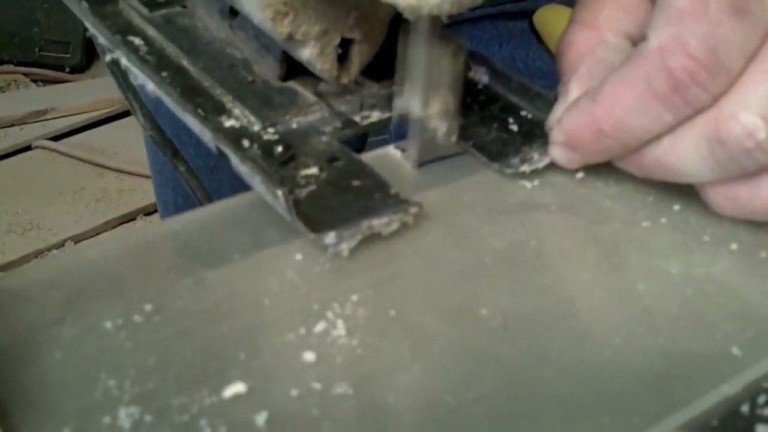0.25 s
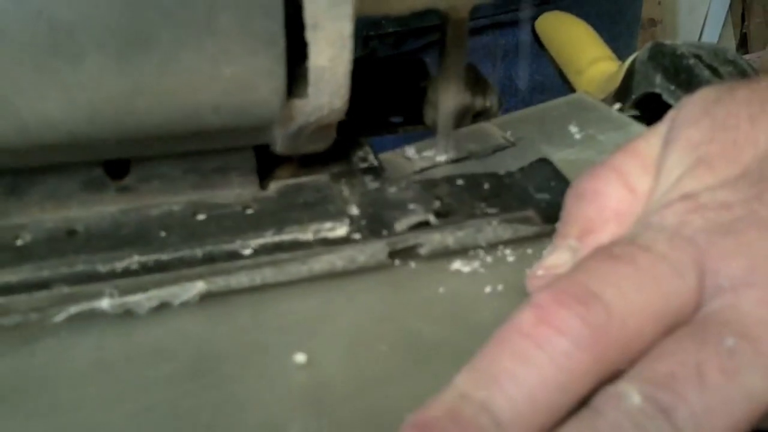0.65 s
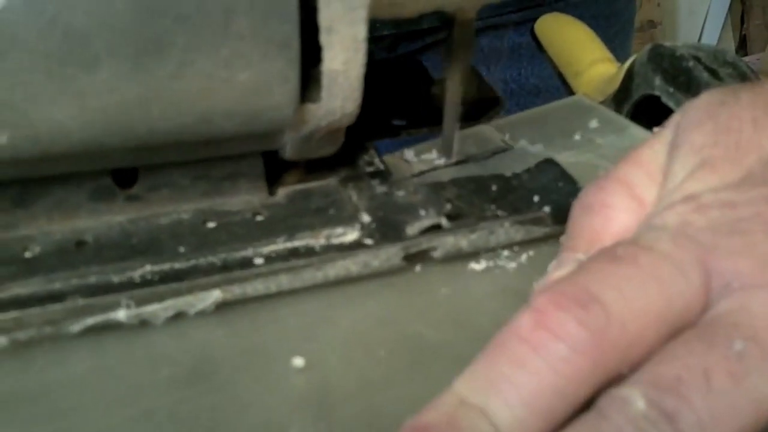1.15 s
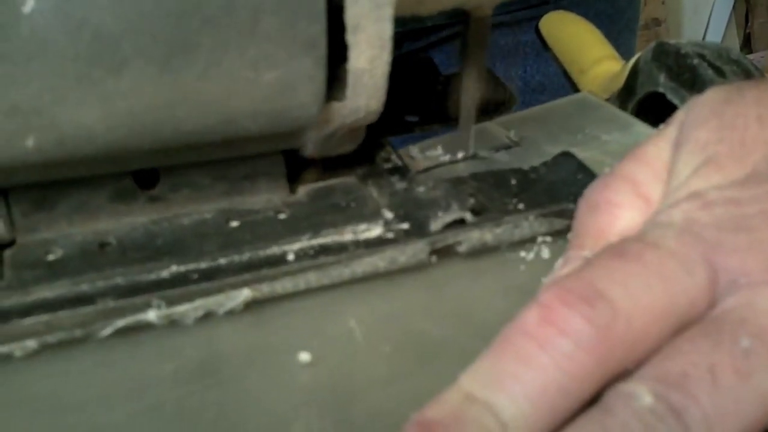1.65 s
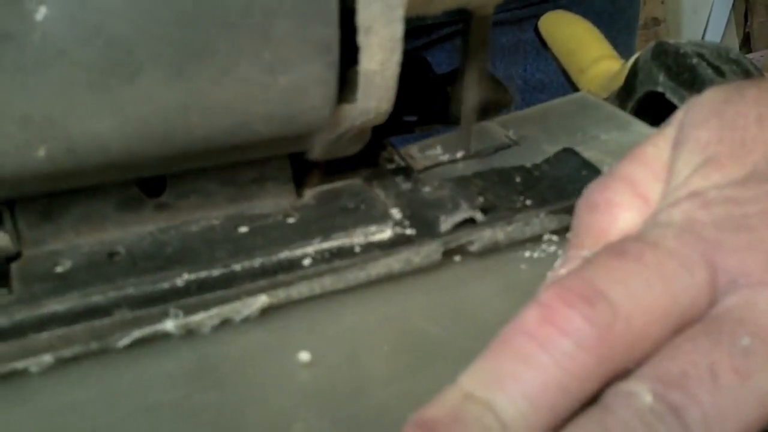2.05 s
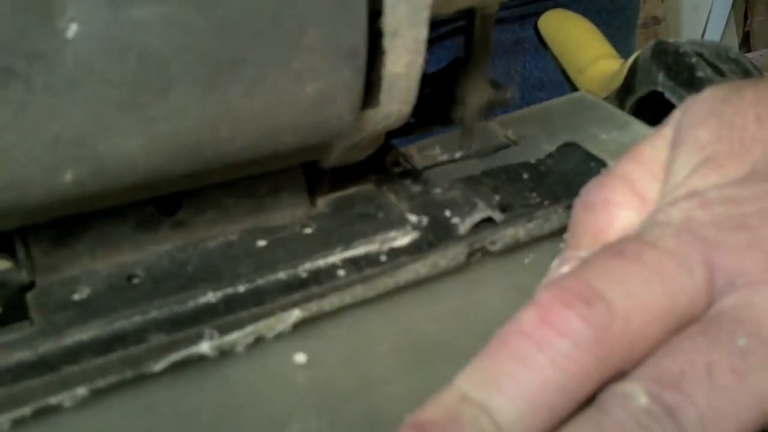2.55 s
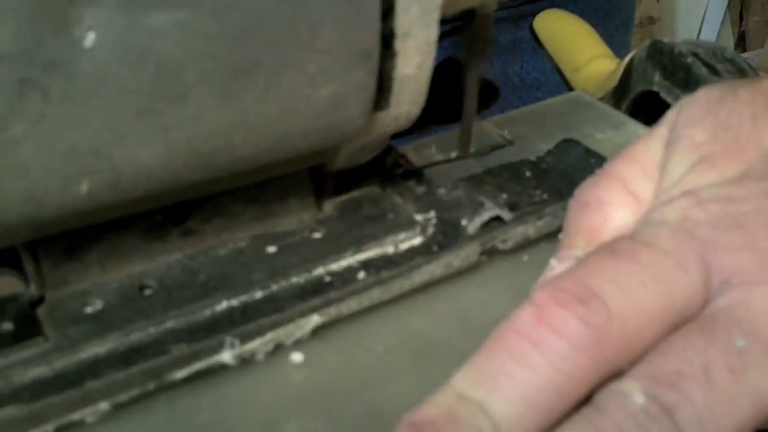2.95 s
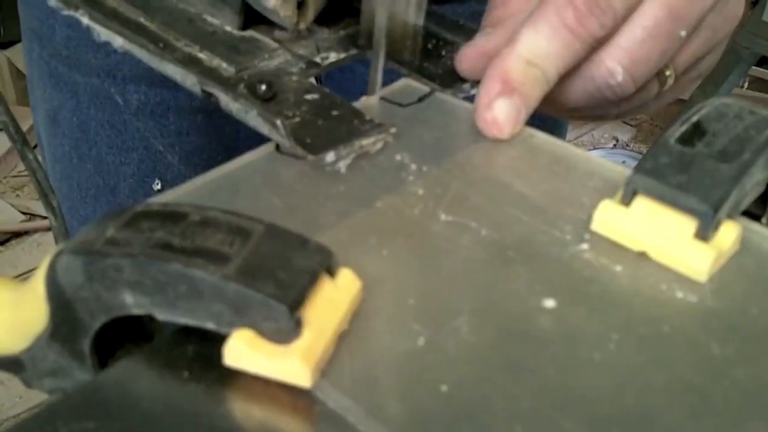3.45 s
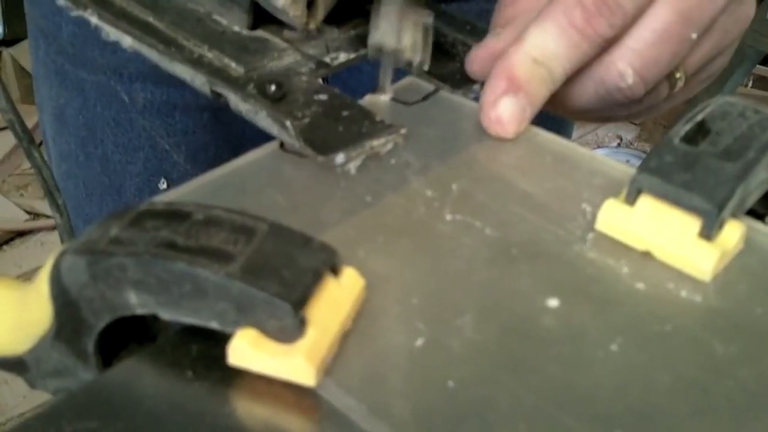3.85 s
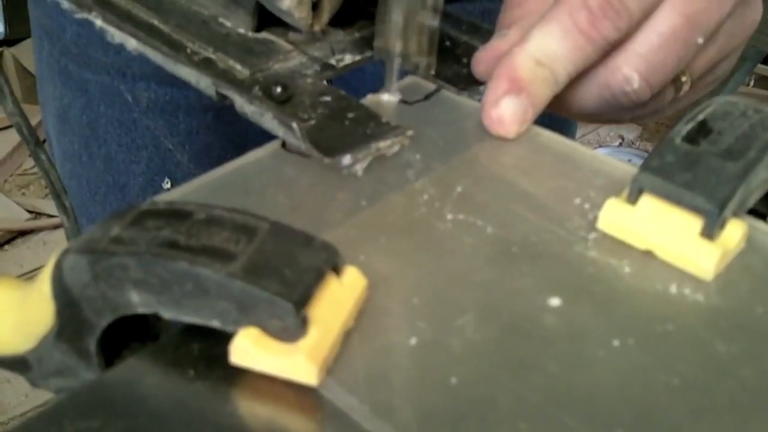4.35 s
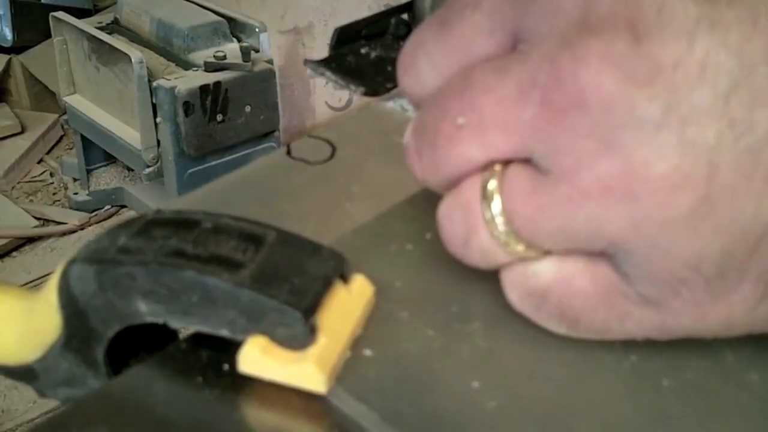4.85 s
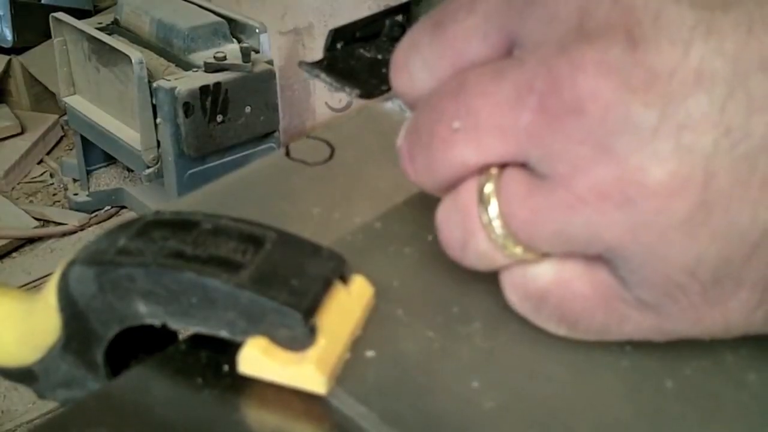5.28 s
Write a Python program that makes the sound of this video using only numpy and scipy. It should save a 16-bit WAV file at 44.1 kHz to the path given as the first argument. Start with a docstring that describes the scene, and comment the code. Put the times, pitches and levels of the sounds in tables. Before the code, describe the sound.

A jigsaw cuts a plastic sheet close up in four passes, a throbbing, buzzing rasp with knocks and brief dips between.

```python
"""In a workshop, close up, a jigsaw cuts a clamped plastic sheet in four passes joined by quick fades.
Each stroke drags the teeth through the plastic and slaps the sheet against the shoe: a throbbing rasp
with hard knocks and a hiss of dust. For a while the sheet's edge taps and the blade squeaks in the kerf.
The crank gear whines, the mechanism hums at multiples of the stroke rate and the bench rumbles.
Once, the microphone is bumped."""
import sys
import numpy as np
from scipy import signal
from scipy.fft import rfft, irfft
from scipy.io import wavfile
from scipy.ndimage import uniform_filter1d

SR = 44100
rng = np.random.default_rng(int(sys.argv[2]) if len(sys.argv) > 2 else 0)


def int16_out(signal):
    """Quantize to a 16-bit WAV file."""
    q = np.round(np.clip(np.atleast_2d(signal).T, -1, 1) * 32767)
    wavfile.write(sys.argv[1], SR, q.astype(np.int16))


N = 243431
TIME = np.arange(N) / SR
HZ = np.fft.rfftfreq(N, 1 / SR)
GEAR_TEETH, PINION_TEETH = 70, 9


def cutting(t, strokes, cut):
    """Chips and slaps shake the plastic sheet and the steel; fine dust hisses above them."""
    # tone of the sheet and of the steel blade and shoe, a list a pass: frequency_hz, gain_db
    sheet_eq = [
        [(88, -48), (150, -16), (236, -19.5), (346, -15.5), (419, -10), (501, -14), (558, -8.5), (1200, -13.5),
         (1320, -3.5), (2000, -8), (2170, -5.5), (2600, -6.5), (3380, -38), (5720, -120)],
        [(88, -36), (150, -10.5), (215, -18), (260, -16.5), (334, -13.5), (466, -12.5), (519, -10.5),
         (691, -11.5), (977, -9.3), (1300, -13.5), (1470, -8.2), (1820, -9.3), (2000, -0.5), (2310, -4.5),
         (2600, -13.5), (3380, -40), (5720, -120)],
        [(88, -57), (150, -10.5), (215, -28), (318, -9), (372, -15.5), (461, -7), (495, -1.5), (606, -8),
         (699, -4.5), (798, -11), (1110, -6), (1210, -7.5), (1610, -2), (2150, -5.3), (2600, -6), (3380, -29),
         (5720, -120)],
        [(88, -49), (150, -14), (195, -25), (215, -31), (254, -17), (372, -14), (495, -5), (571, -20.5),
         (725, -6), (954, -24.5), (1170, -2), (1730, -9.5), (1880, -5.5), (2360, -4.5), (2600, -12),
         (3380, -48), (5720, -120)],
    ]
    steel_eq = [
        [(1650, -44), (2800, -10.5), (3360, 1.5), (3610, 1.5), (3930, -3), (4100, 1.5), (4390, -0.5), (4670, 2),
         (4970, -2), (5400, -20), (7020, -48), (11900, -120)],
        [(1650, -77.5), (2800, -24), (2970, -4), (3240, -0.5), (3380, 1.5), (3550, -4), (4020, 2.5), (4250, 1),
         (4780, 1), (4970, -4.5), (5200, -18), (5400, -21.5), (7020, -49), (11900, -120)],
        [(1650, -38), (2800, -19), (2970, -6.5), (3300, -0.5), (3620, -1), (4710, 0), (5030, -3.5), (5220, -29),
         (5400, -28), (7020, -47), (11900, -120)],
        [(1650, -34), (2800, -11), (3000, -11), (3210, -1), (3400, 0.5), (3900, -2), (4240, -1.5), (4630, -2.5),
         (4970, -3.5), (5400, -36), (7020, -39), (11900, -120)],
    ]
    # tone of the dust's hiss and of brittle splintering: frequency_hz, gain_db
    dust_eq = [(5200, -36), (5700, 0), (6400, 4), (7200, -2.5), (8200, -11), (9300, -9.5), (10400, -11.5),
               (14000, -21.5)]
    splinter_eq = [(8200, 3), (9200, 3.5), (11600, 3), (13800, 1.5), (15200, -19.5)]
    blade_db, sheet_db, dust_db, looseness = feed(t, cut)
    slap = slaps(strokes, cut)
    grit = chips(len(t), per_s=3200, spread_db=2.5, scrape=0.82) * amp(1.92 * wander(t, 420))
    flexing = evened(grit + 1.75 * rng.standard_normal(grit.shape))  # the heavy sheet blurs the chips
    clatter = knocks(t, strokes, rise_s=.0018, decay_s=.0022) * rng.standard_normal(grit.shape)
    blows = evened(slap) * looseness * rng.standard_normal(grit.shape)  # favours the firmest slaps

    def throb(depth):
        power = 1 + depth * slap * looseness ** 2
        return np.sqrt(power / uniform_filter1d(power, size=3000))

    sheet = amp(blade_db + sheet_db + 1) * flexing * throb(0.94) + amp(-10.5) * clatter
    steel = amp(blade_db - 0.86) * grit * throb(0.34) + amp(2) * clatter
    dust = amp(blade_db + dust_db - 0.86) * grit * throb(1) + amp(-12) * clatter
    splinters = amp(blade_db - 28.6) * grit * throb(0.38) + amp(-23) * clatter
    splinters *= amp(1.04 * (dust_db + 15.5))  # splintering grows faster than the dust
    strikes = amp(blade_db - 3) * blows + amp(-1.5) * clatter
    return (colour(sheet, sheet_eq[cut]) + colour(steel, steel_eq[cut])
            + colour(dust, dust_eq) + colour(splinters, splinter_eq) + clack(strikes, cut))


def feed(t, cut):
    """A firm feed makes the blade louder; as it eases, the sheet lifts and sheds more dust."""
    # push on the saw, a list a pass: time_s, feed_db
    pushes = [
        [(0, -1), (.3, 1)],
        [(.6, -1.3), (1.25, -.7), (1.65, -1.3), (1.8, .7), (2.6, 0), (3.3, -.1)],
        [(3.52, -1), (3.93, -3.6), (4.0, .2), (4.65, -.1)],
        [(4.8, -7), (4.93, -2.5), (5.04, -7), (5.12, .3), (5.36, 0), (5.46, -3.5)],
    ]
    # balance of the cut, a row a pass: blade_db, sheet_db and dust_db (both relative to the blade),
    # held_slap_gain, lifted_slap_gain
    balance = [(-24.1, -11.2, -14.3, .8, .8), (-25.4, -8.3, -16, .62, 1.1), (-25.5, -7.8, -12.6, .85, 1.45),
               (-26.4, -5, -14.8, .7, .85)]
    blade_db, sheet_db, dust_db, held, lifted = balance[cut]
    feed_db = glide(pushes[cut], t)
    lift = np.clip(feed_db / -1.2, 0, 1)  # fully lifted at a feed of -1.2 dB
    looseness = held + (lifted - held) * lift
    return blade_db + feed_db, sheet_db + .3 * lift, dust_db + 3 * lift, looseness


def chips(count, per_s, spread_db, scrape):
    """Teeth tear out chips of very unequal size over a smooth scrape; both channels share each chip."""
    size = amp(spread_db * np.minimum(rng.exponential(1, count), 4))
    torn = rng.random(count) < per_s / SR
    clicks = evened(size * torn * rng.choice([-1, 1], (2, count)))
    return evened(clicks + scrape * rng.standard_normal((2, count)))


def slaps(strokes, cut, uneven_db=.8, scatter_strokes=.01):
    """Power envelope of the sheet slapping the shoe; no two slaps are quite alike."""
    # slaps within a stroke, a list a pass: place_strokes, width_strokes, strength_db
    pattern = [
        [(.41, .06, 0.5), (.82, 0.061, -1)],
        [(.28, 0.027, 4), (.38, 0.051, -1.5), (.61, 0.056, -6), (.95, 0.088, -1)],
        [(.33, .05, 1.5), (.635, 0.05, 3)],
        [(.235, .045, 9.5), (.6, .04, 7.5), (.88, 0.06, -1)],
    ]
    power = 0
    for place, width, db in pattern[cut]:
        nearest = np.round(strokes - place).astype(int)
        strength, lag = rng.standard_normal((128, 2))[nearest + 1].T
        offset = strokes - nearest - place - scatter_strokes * lag
        power += amp(db + uneven_db * strength) ** 2 * np.exp(-.5 * (offset / width) ** 2)
    return power


def knocks(t, strokes, rise_s, decay_s):
    """Envelope of the hard knocks: a tooth catches, or the lifted sheet hits the shoe once a stroke."""
    # lone catches: time_s, level_db
    catches = [(0.6128, -20), (1.3953, -14), (1.8088, -19), (3.605, -17.5), (4.0361, -21), (4.1135, -22),
               (4.3136, -20), (4.6262, -17), (4.8364, -19), (4.9325, -21), (5.3763, -23), (5.4167, -21)]
    # spells of chatter: start_s, end_s, place_strokes, level_db
    chatter = [(1.15, 1.7, .28, -26), (3.71, 3.88, .62, -17), (4.27, 4.66, .32, -24.5),
               (4.74, 4.84, .26, -25), (4.92, 5.09, .24, -23), (5.19, 5.32, .61, -21),
               (5.36, 5.51, .21, -21.5)]
    hits = list(catches)
    for start, end, place, db in chatter:
        times = np.interp(np.arange(strokes[-1]) + place, strokes, t, right=np.inf)
        hits += [(s, db) for s in times if start < s < end]
    return sum(amp(db) * np.exp(-np.maximum((s - t) / rise_s, (t - s) / decay_s).clip(0, 50))
               for s, db in hits)


def clack(strikes, cut):
    """Slaps and knocks ring the sheet's short, damped modes."""
    # modes of the sheet as it is held, a list a pass: pitch_hz, t60_s, level_db
    modes = [
        [(1330, 0.015, -15.5), (3460, 0.02, -11)],
        [(1045, 0.022, -17), (1240, 0.032, -12.5), (1468, .03, -13)],
        [(702, 0.036, -19.5), (1650, 0.045, -17.5), (3330, 0.02, -15), (4630, 0.013, -7.5)],
        [(1220, 0.027, -15.5), (2416, 0.013, -4), (3370, .015, -20), (4560, 0.024, -5.5)],
    ]
    age = TIME[:2048]
    body = 0
    for hz, t60, db in modes[cut]:
        mode = amp(-60 * age / t60) * np.cos(2 * np.pi * hz * age)
        body += amp(db) * mode / np.linalg.norm(mode)
    return convolved(strikes, body)


def edge_taps(t, strokes, place=.23, bend=.4, bend_s=.002, rise_s=.0012, t60_s=.04):
    """Once a stroke the free edge lands on the shoe; its note bends up as it is pressed home, and dies."""
    # spells in which the edge rings: start_s, end_s, pitch_hz, level_db
    spells = [(.59, .9, 1230, -27), (.85, 1.42, 1340, -27.5), (1.33, 1.73, 1045, -25.5)]
    age = (strokes - place) % 1 / (np.gradient(strokes) * SR)
    blow = (1 - np.exp(-age / rise_s)) * amp(-60 * age / t60_s + 2 * wander(t, 30))
    bent_age = age - bend * bend_s * (1 - np.exp(-age / bend_s))
    notes = 0
    for start, end, hz, db in spells:
        cycles = hz * bent_age + .25 * wander(t, 90)
        notes += amp(db) * swell(t, start, end) * np.sin(2 * np.pi * cycles)
    return blow * notes


def gear_whine(t, strokes, cut, width_hz=400):
    """Teeth mesh hardest on the loaded part of the stroke; the whine swells near a housing resonance."""
    # resonance of the housing, a row a pass: pitch_hz, level_db
    housing = [(2200, -34), (2040, -26.5), (2050, -33), (2050, -47)]
    housing_hz, db = housing[cut]

    def load(place, sharpness):
        return np.exp(sharpness * (np.cos(2 * np.pi * (strokes - place)) - 1))

    stroke_hz = np.gradient(strokes) * SR
    fast = np.clip((stroke_hz - 30.5) / 2.8, 0, 1)
    slow_load = load(0.89, 2) + 0.58 * load(0.33, 2)
    fast_load = load(0.876, 1.8) + 1.95 * load(0.18, 9.3)  # the plunger's two reversals
    pressure = (1 - fast) * slow_load + fast * fast_load
    mesh = GEAR_TEETH * strokes + 0.15 * wander(t, 150)
    tone = np.sin(2 * np.pi * mesh) + amp(-7.5) * np.sin(4 * np.pi * mesh)
    detuning = 2 * (GEAR_TEETH * stroke_hz - housing_hz) / width_hz
    return amp(db) / (1 + detuning ** 2) * evened(pressure * tone * amp(1.34 * wander(t, 160)))


def blade_squeak(t, strokes, pitch_hz=1485, peak_s=.9, end_s=1.85, place=.96, width=.1):
    """The blade's flank sticks and slips in the kerf once a stroke, and slowly frees itself."""
    rise_db_per_s, fall_db_per_s, stop_db_per_s = 130, 13, 200
    age = t - peak_s
    db = -33 + np.minimum(rise_db_per_s * age, -fall_db_per_s * age)
    db -= stop_db_per_s * np.maximum(t - end_s, 0)
    level = amp(db + 1.5 * wander(t, 60))
    offset = (strokes - place + .5) % 1 - .5
    rub = np.exp(-.5 * (offset / width) ** 2)
    tone = np.sin(2 * np.pi * (pitch_hz * t + .28 * wander(t, 120)))
    return level * evened(rub * tone)


def sheet_resonances():
    """Resonances of the sheet and its support swell and die as the saw moves on."""
    # singing resonances: start_s, end_s, pitch_hz, width_hz, level_db
    resonances = [(-.1, 0.502, 36.8, 2, -43.5), (0.086, 0.33, 98, 3.3, -38.5), (1.7, 3.305, 995, 57, -46),
                  (0.503, 1.9, 4086, 187, -40), (1.85, 3.35, 7030, 190, -47), (1.9, 3.35, 3292, 127, -36.5),
                  (3.85, 4.8, 498, 5.6, -46), (5.043, 5.607, 502.5, 7, -44)]
    singing = 0
    for start, end, hz, width, db in resonances:
        drift = np.cumsum(rng.standard_normal(N)) * np.sqrt(2 * np.pi * width / SR)
        tone = np.sqrt(2) * np.sin(2 * np.pi * hz * TIME + drift)
        singing += amp(db) * swell(TIME, start, end) * tone
    return singing


def mechanism_hum(t, strokes, cut):
    """The plunger shakes the saw, unevenly as the load shifts; the armature adds its own tone."""
    # plunger harmonics: stroke_rate_multiple, then level_db for each of the four passes
    harmonics = [(1.0, -58.0, -62, -44.8, -58), (2.0, -62.0, -63, -49.5, -55),
                 (3.0, -50.5, -43.5, -51, -52), (4.0, -62, -48.5, -60, -57), (5.0, -60, -55.5, -63, -51),
                 (6.0, -61, -59, -62, -65), (7.0, -66, -70, -61, -58), (8.0, -64, -66, -77.0, -87.0),
                 (9.0, -66, -53, -58, -68)]
    # unbalance of the armature, one a pass: level_db
    armature_db = [-70, -51, -62, -72]
    partials = [(multiple, levels_db[cut]) for multiple, *levels_db in harmonics]
    partials.append((GEAR_TEETH / PINION_TEETH, armature_db[cut]))
    speed = np.gradient(strokes)
    hum = 0
    for multiple, db in partials:
        level = amp(db + 1.6 * wander(t, 9))
        hum += level * np.sin(2 * np.pi * (multiple * strokes + rng.random()) + .2 * wander(t, 16))
    return (speed / speed.mean()) ** 2 * hum  # inertial forces grow with the square of the speed


def microphone_bump(start_s, level_db, relax_s, rise_s):
    """A step of pressure that relaxes and undershoots."""
    age = np.maximum(TIME - start_s, 0)
    step = 1 - np.exp(-(age / rise_s) ** 2)
    return amp(level_db) * step * (1 - age / relax_s) * np.exp(-age / relax_s)


def bench_rumble(level_db):
    """The shaking bench gives a low noise."""
    # tone of the bench: frequency_hz, gain_db
    bench_eq = [(25, 10), (60, 1), (110, -4.5), (200, -19.5)]
    return amp(level_db) * colour(rng.standard_normal((1, N)), bench_eq)


def room(x, t60_s, wet_db):
    """Dense, short reflections from the bench and walls."""
    t = TIME[:SR // 3]
    tail = rng.standard_normal((2, len(t))) * amp(-60 * t / t60_s) * (t > .002)
    return x + amp(wet_db) * convolved(x, tail / np.linalg.norm(tail[0]))


def microphone_ports(x):
    """Two close ports agree in the bass; in the treble they part and the left one lags."""
    # likeness of left and right: frequency_hz, coherence
    likeness = [(700, 1), (1400, 1), (3100, 0.96), (4500, 0.93), (6800, 0.95), (10000, 0.55), (15000, 0.8)]
    # phase between the ports: frequency_hz, left_lead_rad
    port_phase = [(1300, 0), (2400, 0.075), (3600, -0.39), (4700, -0.46), (7000, -0.98), (10000, -1.13),
                  (14000, -2.3)]
    coherence = spectrum(likeness, HZ)
    mid = rfft(x[0]) * np.sqrt((1 + coherence) / 2)
    side = rfft(x[1]) * np.sqrt((1 - coherence) / 2)
    lead = np.exp(.5j * spectrum(port_phase, HZ))
    return irfft(np.array([(mid + side) * lead, (mid - side) / lead]), N)


def amp(db):
    """Decibels to gain."""
    return 10 ** (np.asarray(db) / 20)


def evened(x):
    """Scales to unit rms."""
    return x / np.sqrt(np.mean(x ** 2) + 1e-20)


def glide(points, t):
    """Points joined by straight lines in time."""
    return np.interp(t, *np.transpose(points))


def spectrum(points, hz):
    """Points joined by straight lines in log frequency."""
    point_hz, value = np.transpose(points)
    return np.interp(np.log(hz + 1), np.log(point_hz + 1), value)


def swell(t, start_s, end_s):
    """A rounded arch from silence to silence."""
    return np.sqrt(np.sin(np.pi * np.clip((t - start_s) / (end_s - start_s), 0, 1)).clip(0))


def wander(t, per_s):
    """Random drift of about unit size."""
    knots = np.arange(0, 6, 1 / per_s)
    return np.interp(t, knots, rng.standard_normal(len(knots)))


def convolved(x, response):
    """Plays x through an impulse response, keeping its length."""
    return signal.oaconvolve(x, np.atleast_2d(response), axes=1)[:, :x.shape[1]]


def colour(x, eq):
    """Minimum-phase filter of unit energy that follows eq and falls steeply outside it."""
    hz = abs(np.fft.fftfreq(4096, 1 / SR)) + 1
    octaves_outside = abs(np.log2(hz / np.clip(hz, eq[0][0], eq[-1][0])))
    gain_db = np.maximum(spectrum(eq, hz) - 60 * octaves_outside, -90)
    log_response = np.conj(signal.hilbert(np.log(amp(gain_db))))
    response = np.fft.ifft(np.exp(log_response)).real
    return convolved(x, response / np.linalg.norm(response))


def scene():
    """Four passes of the saw; the level dips briefly at each join."""
    # speed of the saw, a table a pass: time_s, stroke_rate_hz
    speed_1 = [(0.0, 38.44), (0.12, 34.51), (0.25, 28.99), (0.38, 26.22), (0.5, 27.43)]
    speed_2 = [(0.5, 29.523), (0.709, 28.399), (1.152, 32.016), (1.527, 28.573), (1.942, 32.789),
               (2.226, 34.135), (2.628, 33.152), (3.37, 33.896)]
    speed_3 = [(3.37, 34.8), (3.641, 36.333), (3.931, 34.861), (4.74, 36.408)]
    speed_4 = [(4.74, 27.57), (4.89, 26.63), (5.05, 27.46), (5.21, 27.06), (5.36, 25.97), (5.52, 26.91)]
    # fades into passes 2, 3 and 4: length_s
    fade_in_s = [0.09, 0.115, .04]
    fade_out_s, fade_floor = .1, .025
    rasp, tones, fade = np.zeros((2, N)), sheet_resonances(), np.ones(N)
    for cut, speed in enumerate([speed_1, speed_2, speed_3, speed_4]):
        now = (TIME >= speed[0][0]) & (TIME < speed[-1][0])
        t = TIME[now]
        strokes = np.cumsum(glide(speed, t)) / SR  # one stroke is a full turn of the crank
        rasp[:, now] = cutting(t, strokes, cut)
        tones[now] += mechanism_hum(t, strokes, cut) + gear_whine(t, strokes, cut)
        tones[now] += blade_squeak(t, strokes) + edge_taps(t, strokes)
        if cut:
            age = TIME - t[0]
            fade *= np.clip(np.maximum(-age / fade_out_s, age / fade_in_s[cut - 1]), fade_floor, 1)
    rumble = bench_rumble(level_db=-58)
    rasp = microphone_ports(room(rasp, t60_s=0.17, wet_db=-15))
    bump = microphone_bump(start_s=1.3945, level_db=-7.5, relax_s=0.016, rise_s=0.0019)
    return fade * (rasp + tones + rumble) + bump


def record(dry):
    """Steady narrow notches hollow the treble, and the very top is cut off."""
    # steady dips in the treble: centre_hz, width_hz, depth_db
    notches = [(2690, 180, 15), (5540, 170, 23), (7860, 504, 37), (10870, 400, 42)]
    dips_db = sum(depth * np.exp(-(2 * (HZ - hz) / width) ** 2) for hz, width, depth in notches)
    notched = irfft(rfft(dry) * amp(-dips_db), N)
    lowpass = signal.firwin(255, cutoff=15550, window=("kaiser", 9), fs=SR)
    return signal.oaconvolve(notched, lowpass[None], "same")


dry = scene()
out = record(dry)
int16_out(out)
```